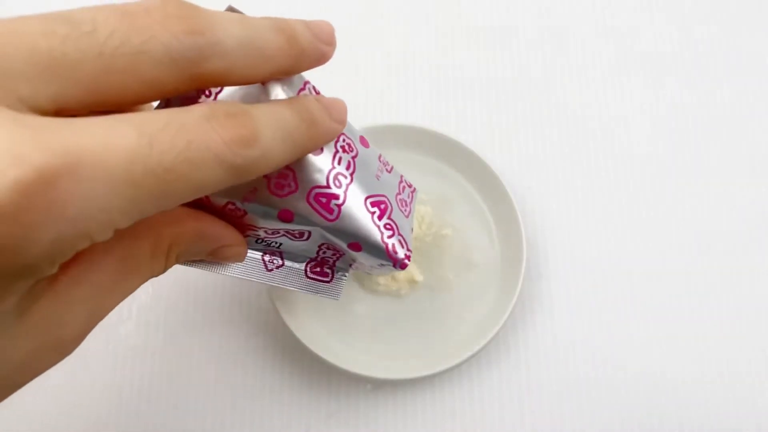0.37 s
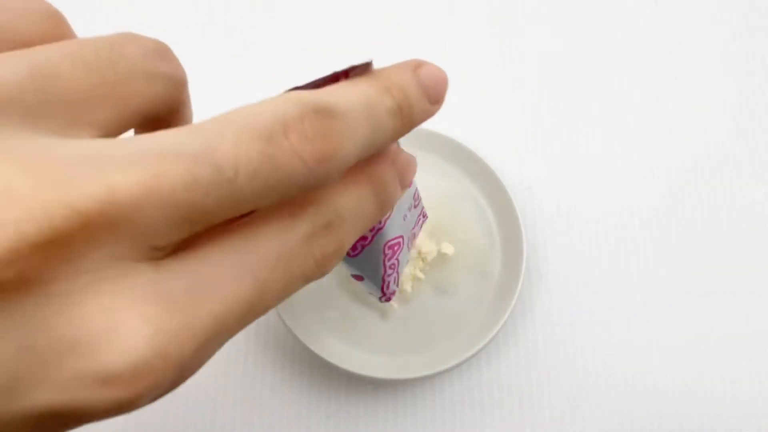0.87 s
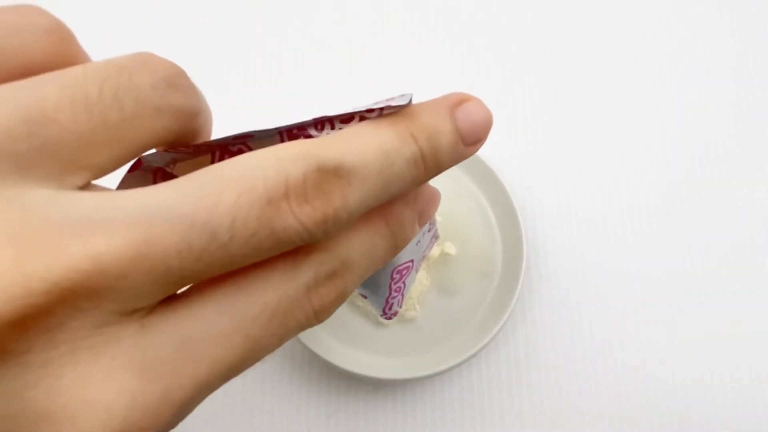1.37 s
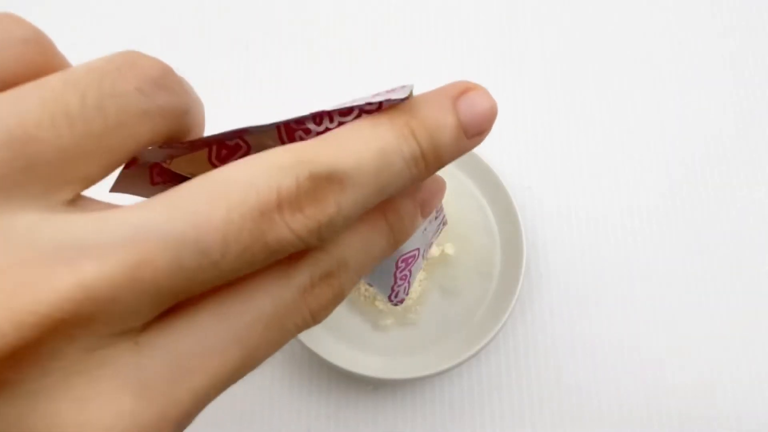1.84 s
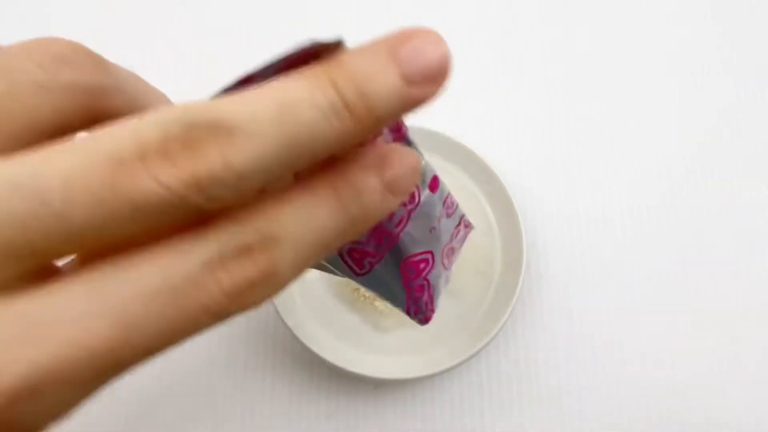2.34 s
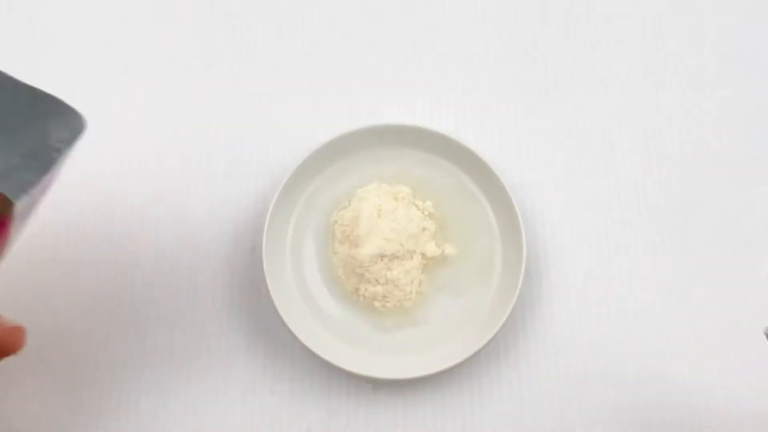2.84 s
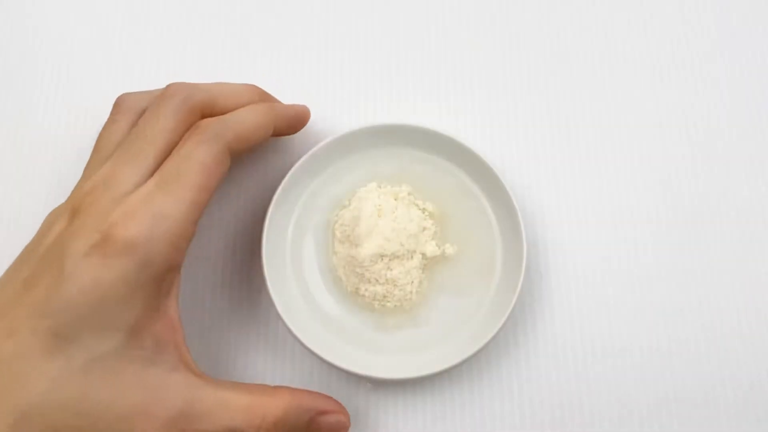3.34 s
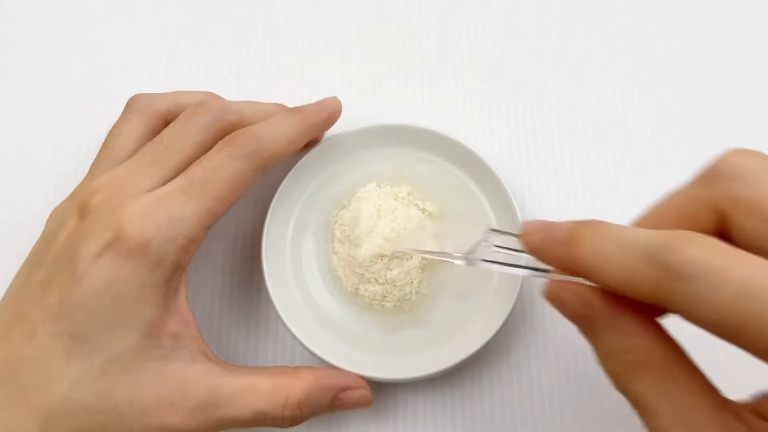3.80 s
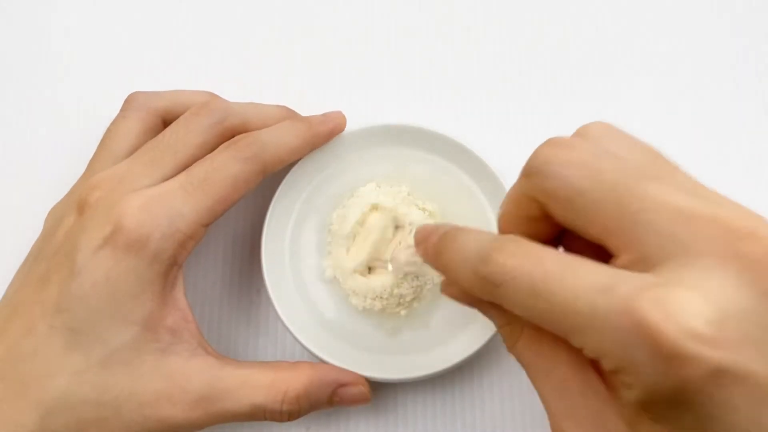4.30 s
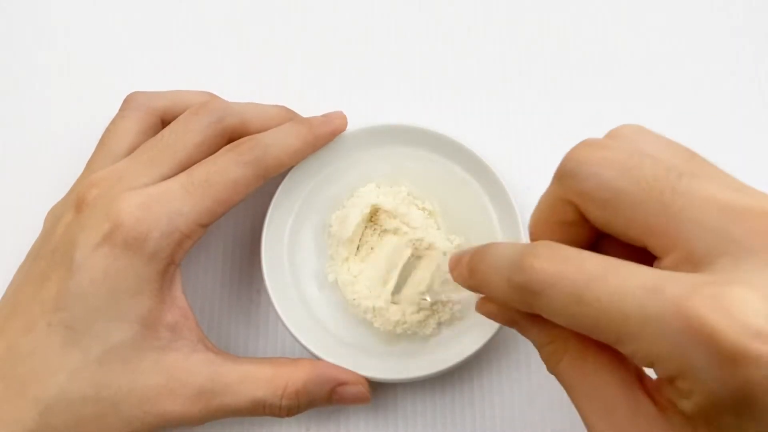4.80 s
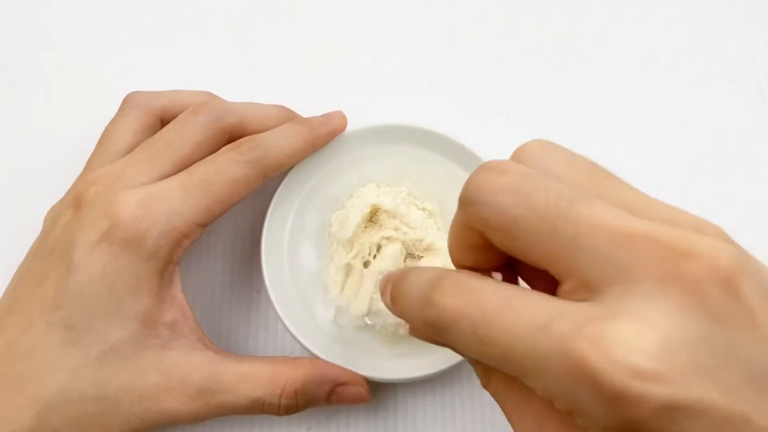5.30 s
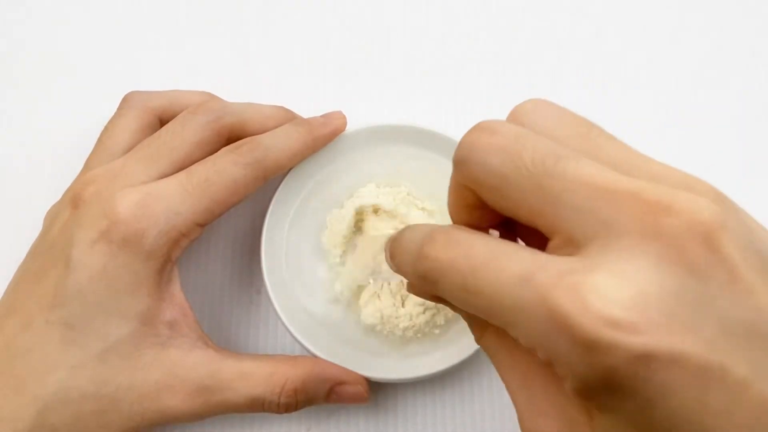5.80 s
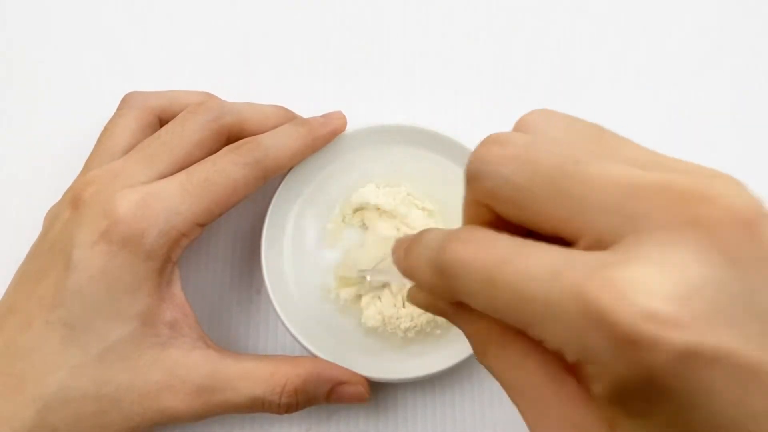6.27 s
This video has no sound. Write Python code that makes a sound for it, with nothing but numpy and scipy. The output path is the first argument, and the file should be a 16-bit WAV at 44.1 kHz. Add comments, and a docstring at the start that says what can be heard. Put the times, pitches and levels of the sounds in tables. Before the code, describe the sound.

Fine dry powder pours with a bright uneven hiss from a foil sachet into a small ceramic dish. Fingers flick the foil, one snap sharp and loud, with softer pats afterwards. After a cut and a brief quiet, a plastic spoon chops about every fifth of a second, crunching grains and clicking on ceramic. Close stereo microphones, quiet live room with a low hum.

```python
"""Dry powder hisses out of a foil sachet into a small ceramic dish while fingers flick the foil;
after an edit a plastic spoon chops through the heap, crunching and tapping the dish.
Sliding powder is a rain of grains; flicks and chops are crack clusters ringing foil or dish modes.
A quiet, live room hums below; a close stereo pair hears it, the left side a little late."""
import sys
import numpy as np
from scipy import signal
from scipy.fft import rfft, irfft
from scipy.io import wavfile
from scipy.ndimage import uniform_filter1d

SR = 44100
rng = np.random.default_rng(int(sys.argv[2]) if len(sys.argv) > 2 else 0)


def invert_db(level):
    """Linear amplitude ratio for a level in decibels (20 dB per decade), elementwise."""
    return 10 ** (np.asarray(level, dtype=float) / 20)


def wav_record(signal):
    """Record a signal, one row per channel, as 16-bit PCM in the file named by sys.argv[1]."""
    frames = np.transpose(np.atleast_2d(signal))
    bounded = np.clip(frames, -1, 1)
    # unit amplitude maps onto the largest positive 16-bit level
    quanta = np.round(bounded * 32767).astype(np.int16)
    wavfile.write(sys.argv[1], SR, quanta)


N = 293265
LEAD = 256  # samples of room before each blow for its filter
USUAL_DB = -35  # peak of an ordinary stroke

# spoon bites into the heap, down to the dish: start_s, peak_db, favoured_hz, boom_db, crunch_ms
CHOPS = [(3.9528, -41, 2438, -23, 2.3), (3.962, -38, 2420, -7, 8.5), (4.3313, -49.5, 3300, -19, 17),
         (4.347, -39.5, 2990, -28.5, 2.5), (4.555, -29, 4825, 0, 5.4), (4.5907, -43, 4530, 3, 8.6),
         (4.7462, -30, 4700, 2.5, 8.7), (4.9382, -35.5, 3500, 3.5, 4.7), (5.1167, -33, 4780, -3, 9.4),
         (5.313, -24, 4410, -16.5, 10), (5.3274, -30.5, 2960, -14, 7.2), (5.5653, -32, 3053, -8, 6.6),
         (5.5825, -33, 4680, -27, 2.5), (5.7561, -35.5, 3665, -2, 8.9), (5.9803, -28.5, 5110, -12, 8.3),
         (6.1526, -25, 5276, -9.5, 14), (6.1867, -48, 5500, -13.5, 10.3), (6.3704, -47, 5260, -19, 9.2),
         (6.6067, -41.5, 2420, 15.5, 8.6)]


def read(points, hz):
    """Table value at hz, straight on a log-frequency axis."""
    f, value = np.transpose(points)
    return np.interp(np.log(hz + 1), np.log(f + 1), value)


def evened(x):
    """Scales to rms 1."""
    return x / np.sqrt(np.mean(x ** 2) + 1e-20)


def add(mix, start_s, sound):
    """Mixes a sound in at start_s."""
    part = mix[..., round(start_s * SR):][..., :sound.shape[-1]]
    part += sound[..., :part.shape[-1]]


def colour(x, db_of_hz):
    """Filters the last axis by a gain in dB given per frequency."""
    hz = np.fft.rfftfreq(x.shape[-1], 1 / SR)
    return irfft(rfft(x) * invert_db(db_of_hz(hz)), x.shape[-1])


def pair(x, same):
    """Three independent draws become left and right with a shared part."""
    return np.sqrt(same) * x[0] + np.sqrt(1 - same) * x[1:]


def packed(s, loose_and_packed):
    """A value that drifts as stirring turns the heap from loose and dry to packed and damp."""
    stir_s = (4.0, 5.66)
    return np.interp(s, stir_s, loose_and_packed)


def strokes():
    """First bite of each spoon stroke: start_s, peak_db."""
    new_stroke_s = 0.1  # a bite sooner than this after the last belongs to the same stroke
    start_s, peak_db = np.transpose(CHOPS)[:2]
    first = np.diff(start_s, prepend=0) > new_stroke_s
    return zip(start_s[first], peak_db[first])


def slides(per_s=6000, spread_db=2.5, split_hz=8500):
    """Thousands of fine grains a second tick on the surface; the flow sets the hiss and its body."""
    # spectrum of sliding grains: pitch_hz, relative_db
    slide_colour = [(500, -25.5), (1200, -8), (1700, -7), (1880, 5), (2100, -4.5), (4000, -4), (7000, -1),
                    (11000, 3), (15500, 6), (16600, -20)]
    sizes = invert_db(spread_db * rng.exponential(1, (3, N)))
    struck = rng.random((3, N)) < per_s / SR
    grains = sizes * struck * rng.choice([-1., 1.], (3, N))
    hiss = colour(pair(grains, 0.18), lambda hz: read(slide_colour, hz))
    fine = colour(hiss, lambda hz: -20 * np.log10(1 + (split_hz / (hz + 1)) ** 6))
    fine, body = evened(fine), evened(hiss - fine)
    t, out = np.arange(N) / SR, np.zeros((2, N))
    for rows in flows():
        s, fine_db, body_db = np.transpose(rows)
        on = (t >= s[0]) & (t <= s[-1])
        since_s = t[on] - s[0] + (s[0] == 0)  # a flow from 0 s is already running
        edges = np.clip(np.minimum(since_s, s[-1] - t[on]) / 0.004, 0, 1)
        mix = fine[:, on] + invert_db(np.interp(t[on], s, body_db)) * body[:, on]
        out[:, on] += edges * invert_db(np.interp(t[on], s, fine_db)) * mix
    return out


def flows():
    """Every run of grains (pour, spoon ploughing, scuffs) as rows of time_s, hiss_db, relative body_db."""
    # powder running out of the sachet: time_s, hiss_db
    pour_points = [(0.0, -47), (0.332, -51), (0.378, -56), (0.442, -54.5), (0.482, -61.5), (0.536, -56),
                   (0.58, -75.5), (0.71, -70), (0.772, -62.5), (0.818, -56), (0.876, -49), (0.906, -55.5),
                   (0.97, -47), (1.028, -57.5), (1.103, -55), (1.134, -74), (1.17, -75.5)]
    # brief slides of fingers on foil and of the spoon over the heap: loudest_s, hiss_db, rise_s, fade_s
    scuff_rows = [(2.331, -79, 0.085, 0.22), (2.675, -62, 0.065, 0.0049), (3.24, -68.5, 0.064, 0.066),
                  (3.55, -79, 0.12, 0.095), (4.037, -71.5, 0.1, .01), (4.124, -63, 0.038, 0.036),
                  (4.409, -58.5, .05, 0.0055), (6.025, -54.5, 0.027, 0.039), (6.377, -46, 0.0035, 0.027),
                  (6.44, -65.5, .06, 0.055)]
    pour_body_db, scuff_body_db, scuff_depth_db = 2, -2, 13.5
    # loose, packed: hiss swelling into each stroke, spilling after it
    plough_db, plough_depth_db = (-54, -57), (11, 22.5)
    plough_s, plough_body_db = (0.066, 0.015), (-8.5, 3.5)
    spill_s = 0.0223
    runs = [[(*row, pour_body_db) for row in pour_points]]
    for s, _ in strokes():
        runs.append(swell(s, packed(s, plough_db), packed(s, plough_s), spill_s,
                          packed(s, plough_depth_db), packed(s, plough_body_db)))
    for row in scuff_rows:
        runs.append(swell(*row, scuff_depth_db, scuff_body_db))
    return runs


def swell(s, db, rise_s, fade_s, depth_db, body_db):
    """Level points of one slide: up from depth_db below, then down again."""
    return [(s - rise_s, db - depth_db, body_db),
            (s, db, body_db),
            (s + fade_s, db - depth_db, body_db)]


def flicks():
    """Taps and creases of the foil sachet: sparkling or hard ones are short snaps, others longer pats."""
    # fingers flicking the sachet: start_s, peak_db, favoured_hz, boom_db, sparkle_db
    flick_rows = [(0.0076, -32.5, 1800, -8.5, -10), (0.6824, -54.5, 2260, 5, -7),
                  (0.9918, -50, 2974, 16, -7), (1.1916, -15, 4150, -3.5, -4.5),
                  (1.1961, -31.5, 2300, 7, -20), (1.366, -28.5, 1900, -2, -16.5),
                  (1.3714, -34, 1830, 3.5, -30), (1.4449, -43.5, 1900, 4, -29),
                  (1.9576, -44.5, 2100, 10.5, -57), (2.3188, -61, 2124, 5, -20),
                  (2.5336, -51.5, 1940, -1, -60), (2.6582, -36.5, 1910, -0.5, -32),
                  (2.6662, -36.5, 2300, -8, -29), (2.697, -50, 1860, -10, -38), (2.7349, -54, 2090, 5, -17),
                  (2.7523, -28.5, 1960, -9, -45.5), (2.8444, -58, 1880, -6, -10.5),
                  (2.9165, -48.5, 2410, -8.5, -10), (2.937, -34.5, 2610, -9, -23)]
    # foil resonances: pitch_hz, width_hz, relative_db
    foil_modes = [(460, 300, 11.5), (984, 330, 9.5), (1861, 300, -30), (2100, 400, -0.5), (2560, 300, -2.5),
                  (3628, 820, -24), (4150, 600, -10), (5050, 1500, 8), (6600, 270, 2.5), (7500, 700, -11)]
    snap_ms, pat_ms = 3.5, 9.1
    snap_db, hard_db = -12.5, -32  # snap above this sparkle or this peak
    out = np.zeros((2, N + LEAD))
    for start_s, peak_db, favoured_hz, boom_db, sparkle_db in flick_rows:
        snappy = invert_db(4 * (sparkle_db - snap_db)) + invert_db(4 * (peak_db - hard_db))
        ms = snap_ms + (pat_ms - snap_ms) / (1 + snappy)
        add(out, start_s, crunch(foil_modes, peak_db, favoured_hz, boom_db, sparkle_db, ms,
                                 ring_db=-23, focus_db=12.0, hump_db=7.0, slope_db=3.0,
                                 edge_db=18.5, air_db=-3.0))
    return out[:, LEAD:]


def chops():
    """Each spoon stroke crunches the grains and rings the dish; the table answers with a low thump."""
    # dish resonances: pitch_hz, width_hz, relative_db
    dish_modes = [(1206, 520, -5.5), (2310, 470, 6.5), (3480, 34, -11.5), (3780, 83, -17), (4600, 160, -2),
                  (4780, 140, -2), (5110, 420, 0.5), (5520, 270, 1), (6950, 150, -13.5), (6910, 3600, -0.5)]
    usual_sparkle_db = (-2, -3.5)  # ordinary stroke: loose, packed
    sparkle_loss = 0.36  # dB per dB: harder strokes ring the dish more
    top_octave_db = (6.5, 0.5)  # loose, packed
    thump_db, thump_slope = (-40.5, -33.5), 0.44  # ordinary stroke: cushioned, bare; dB per dB of peak
    bare_s = (5.3, 5.47)  # the spoon starts to meet bare dish
    out, thump = np.zeros((2, N + LEAD)), table_thump()
    for start_s, peak_db, favoured_hz, boom_db, ms in CHOPS:
        sparkle_db = packed(start_s, usual_sparkle_db) - sparkle_loss * (peak_db - USUAL_DB)
        add(out, start_s, crunch(dish_modes, peak_db, favoured_hz, boom_db, sparkle_db, ms,
                                 ring_db=-20.5, focus_db=26.0, hump_db=1.5, slope_db=2.5,
                                 edge_db=39, air_db=packed(start_s, top_octave_db)))
    for start_s, peak_db in strokes():
        gain_db = np.interp(start_s, bare_s, thump_db) + thump_slope * (peak_db - USUAL_DB)
        add(out, start_s + LEAD / SR, invert_db(gain_db) * thump)
    return out[:, LEAD:]


def table_thump():
    """Decaying low modes of the table; the dish rocks back onto it once."""
    # table modes under the dish: pitch_hz, relative_db, t60_s
    table_modes = [(123, -17, 0.1), (249.5, -2.5, 0.13), (328, 3, 0.063), (383, -5.5, 0.047)]
    rock_s, rock_db = 0.04, -6
    t = np.arange(SR // 4) / SR
    thump = sum(invert_db(db - 60 * t / t60_s) * np.sin(2 * np.pi * hz * t) for hz, db, t60_s in table_modes)
    thump *= 1 - np.exp(-t / 0.0035)
    add(thump, rock_s, invert_db(rock_db) * thump)
    return thump


def crunch(modes, peak_db, favoured_hz, boom_db, sparkle_db, ms,
           ring_db, focus_db, hump_db, slope_db, edge_db, air_db):
    """A cluster of tiny cracks rings a body; the place of contact favours the modes near one pitch."""
    t = np.arange(2048) / SR
    u = t / (max(ms, 0.5) / 1000)
    sizes = invert_db(4.23 * np.minimum(rng.exponential(1, len(t)), 4)) * u ** 0.36 * np.exp(-3.2 * u)
    tones = rfft(pair(sizes * rng.standard_normal((3, len(t))), 0.48))
    # flatten the spectrum of the random cracks
    cracks = irfft(tones / np.sqrt(uniform_filter1d(abs(tones) ** 2, size=28, axis=1)))
    cracks = cracks * (t < t[-1] / 2)
    ring = np.zeros(len(t))
    ring[0] = 1  # direct sound
    for k, (hz, width_hz, db) in enumerate(modes):
        hz = hz * (1 + 0.037 * rng.uniform(-1, 1))  # grip and load shift the modes a little
        near_db = -focus_db * abs(np.log2(hz / favoured_hz)) * (hz > 1500)
        swing = np.exp(-np.pi * width_hz * t) * np.sin(2 * np.pi * hz * t)
        ring += (-1) ** k * invert_db(ring_db + db + near_db) * swing  # neighbours swing in opposite senses
    body = irfft(rfft(cracks) * rfft(ring))
    top_db = sparkle_db + slope_db
    tilt = [(300, boom_db - edge_db), (1050, boom_db + 0.5), (1600, 0.25 * boom_db - 2.0), (2300, 0),
            (4500, 0.24 * top_db), (7000, 0.59 * top_db), (11000, top_db), (15500, top_db + air_db)]

    def hump(hz):
        return hump_db * np.exp(-(np.log2((hz + 1) / favoured_hz) / 0.27) ** 2)

    sound = colour(np.roll(body, LEAD, axis=1), lambda hz: read(tilt, hz) + hump(hz))
    # peak_db sets the loudest 2 ms between 1.5 and 8 kHz
    middle = colour(sound, lambda hz: -60 * ((hz < 1500) | (hz > 8000)))
    return invert_db(peak_db) * sound / np.sqrt(uniform_filter1d((middle ** 2).mean(0), size=88).max())


def echoes(x, turn_s=0.55):
    """Three random echo patterns fade into one another in turn, so no single colouring stays."""
    turn = np.pi * np.arange(N) / SR / turn_s
    return sum(room(x * np.sqrt(2 / 3) * np.cos(turn + k * np.pi / 3)) for k in range(3))


def room(x, gap_ms=6, early_db=6, early_ms=20):
    """Dense random-sign echoes, strongest off table and near walls, each band dying at its own speed."""
    # reverberation: pitch_hz, t60_s
    decay_points = [(300, 0.96), (1000, 0.5), (3000, 0.71), (6000, 0.59), (12000, 0.2)]
    ms = np.arange(SR) / SR * 1000
    envelope = (1 - np.exp(-(ms / gap_ms) ** 2)) * invert_db(early_db * np.exp(-ms / early_ms))
    taps = rng.standard_normal((2, SR)) * envelope
    hz, t, z = signal.stft(taps, SR, nperseg=256)
    decay = invert_db(-60 * t / read(decay_points, hz)[:, None])
    tail = signal.istft(z * decay, SR, nperseg=256)[1]
    return signal.fftconvolve(x, tail / np.linalg.norm(tail[0]), axes=1)[:, :N]


def air(level_db=-45.5, patchy_db=1.5):
    """Room tone: dark noise gathered in the low room modes, most alike at both capsules in the bass."""
    # room tone spectrum: pitch_hz, relative_db
    air_colour = [(20, -34.5), (32, -33.5), (42, -9), (60, -9), (140, -16.5), (210, -17), (400, -16.5),
                  (600, -23.5), (1000, -26.5), (1400, -35.5), (2200, -40.5), (3000, -53), (6000, -57),
                  (12000, -60), (16000, -60)]
    # room modes: pitch_hz, width_hz, boost_db
    hum_modes = [(47.7, 6.5, 10.5), (80.27, 3.8, 10.5), (112.6, 13, 12), (171, 7.3, 8), (251, 13, 8.5),
                 (313, 6.1, 8.5)]
    # left-right correlation: pitch_hz, likeness (0 to 1)
    likeness = [(60, 0.99), (180, 0.83), (550, 0.19), (1650, 0.37), (4970, 0), (15000, 0)]
    frames, hz = N // 2048 + 5, np.fft.rfftfreq(8192, 1 / SR)
    a, b, c, d, patches = rng.standard_normal((frames, 4097, 5)).T
    patches = uniform_filter1d(uniform_filter1d(patches, size=16, axis=0), size=2, axis=1)
    modes_db = sum(db / (1 + (2 * (hz - f) / width_hz) ** 2) for f, width_hz, db in hum_modes)
    same, left = np.clip(read(likeness, hz), -1, 1)[:, None], a + 1j * b
    z = np.array([left, same * left + np.sqrt(1 - same ** 2) * (c + 1j * d)])
    z *= invert_db((read(air_colour, hz) + modes_db)[:, None] + patchy_db * evened(patches))
    return invert_db(level_db) * evened(signal.istft(z, nperseg=8192, noverlap=6144)[1][:, :N])


def scene():
    """An edit splits the scene: echoes stop at it and the second part fades in."""
    edit_s, fade_s = 3.117, 0.054
    t = np.arange(N) / SR
    hands = slides() + flicks() + chops()
    first = t < edit_s
    wet = np.where(first, echoes(hands), echoes(hands * ~first))
    fade = np.where(first, 1, np.clip((t - edit_s) / fade_s, 0.05, 1))
    return fade * (hands + invert_db(-10.5) * wet + air())


def top_cut(x):
    """Nothing passes above the cut-off."""
    return signal.sosfilt(signal.butter(12, 16830, fs=SR, output="sos"), x)


def record(dry):
    """Both sides carry one and the same treble signal; the left-right balance varies with pitch, left late."""
    # channel balance: pitch_hz, left_over_right_db
    lean_points = [(60, 2.5), (200, -0.5), (700, 1.5), (4000, 1), (9000, 2.6)]
    one_treble_hz = 6930  # above this both sides carry their mean
    left_late_ms, treble_turn_cycles = 0.247, 0.24  # left lag; further turn of its treble
    hz = np.fft.rfftfreq(N, 1 / SR)
    averaged = 1 / (1 + (one_treble_hz / (hz + 1)) ** 16)
    left, right = rfft(dry)
    left, right = left + averaged * (right - left) / 2, right + averaged * (left - right) / 2
    lag = np.exp(-2j * np.pi * (hz * left_late_ms / 1000 + treble_turn_cycles * averaged))
    lean = invert_db(read(lean_points, hz) / 2)
    mix = irfft(np.array([left * lag * lean, right / lean]), N)
    return top_cut(mix)


dry = scene()
out = record(dry)
wav_record(out)
```